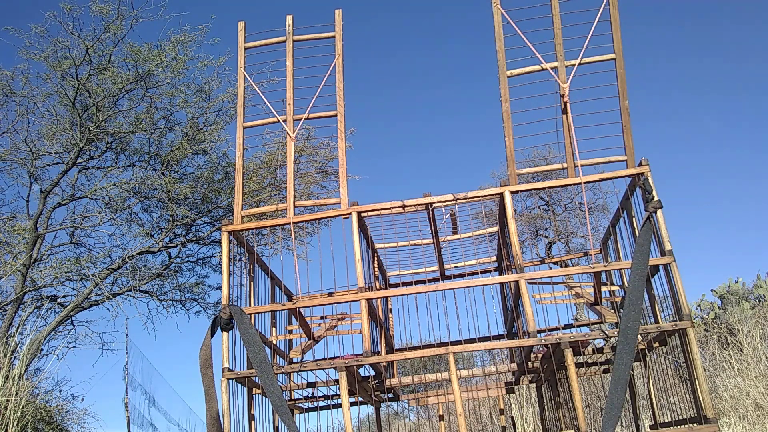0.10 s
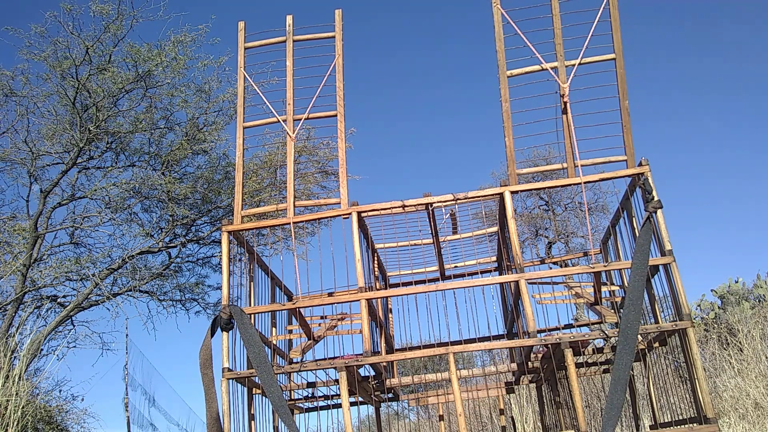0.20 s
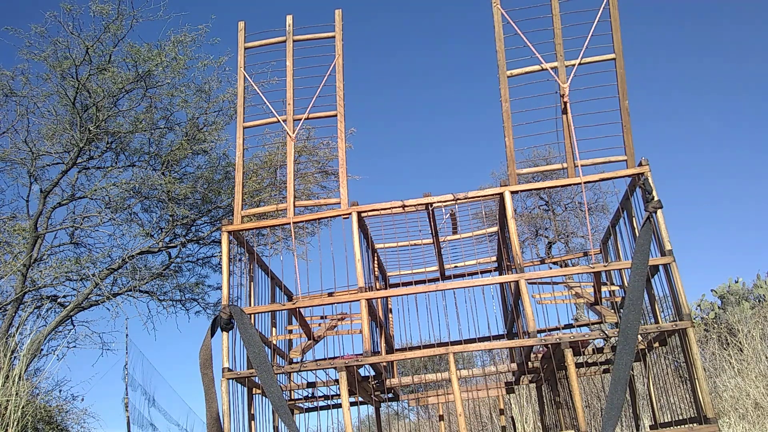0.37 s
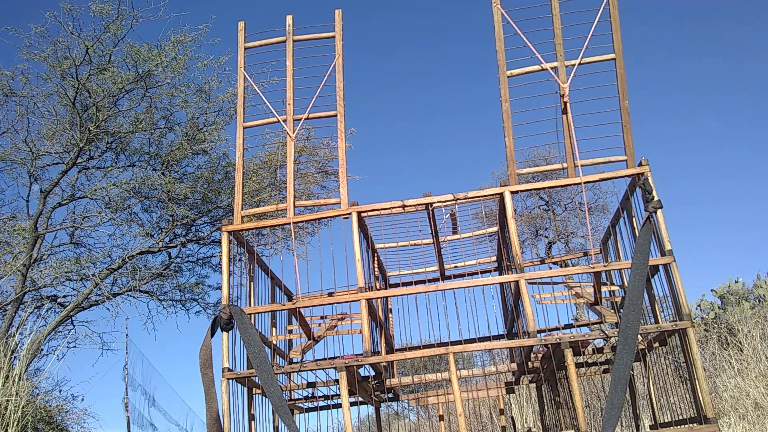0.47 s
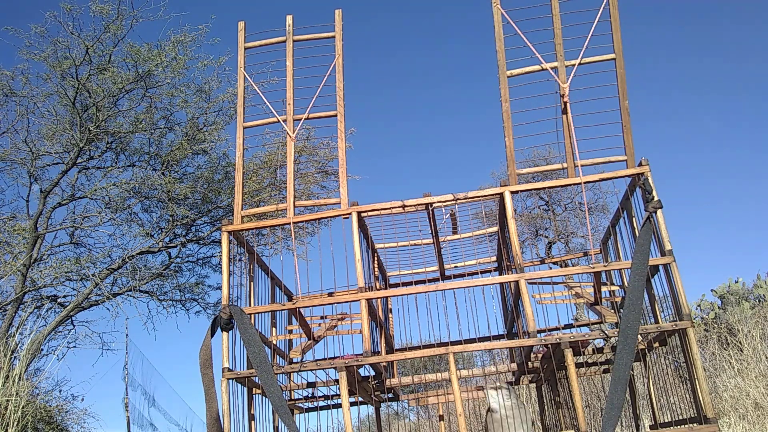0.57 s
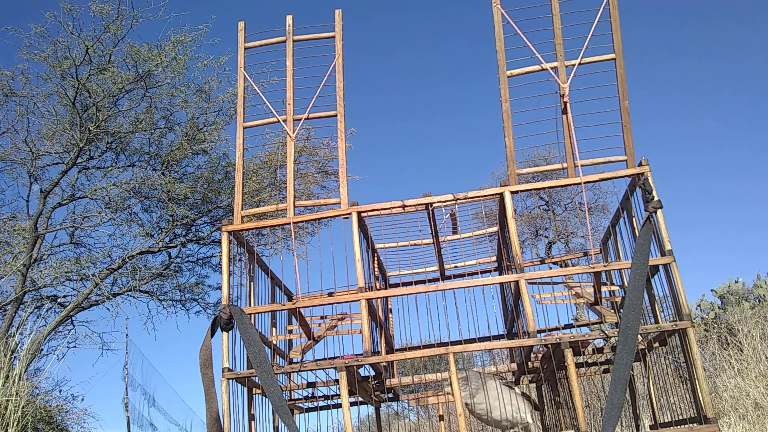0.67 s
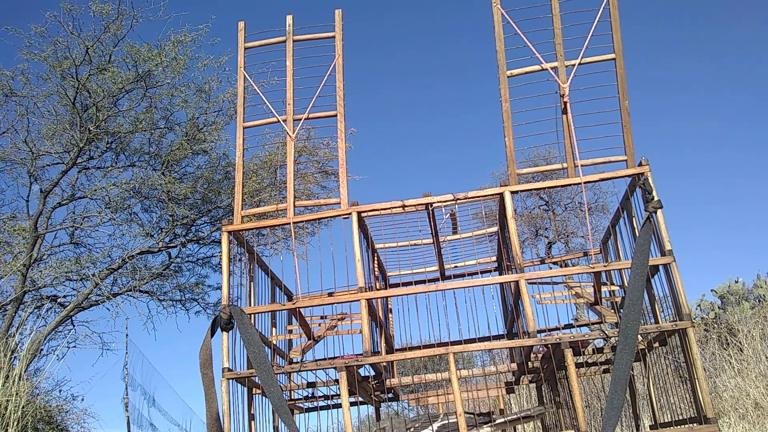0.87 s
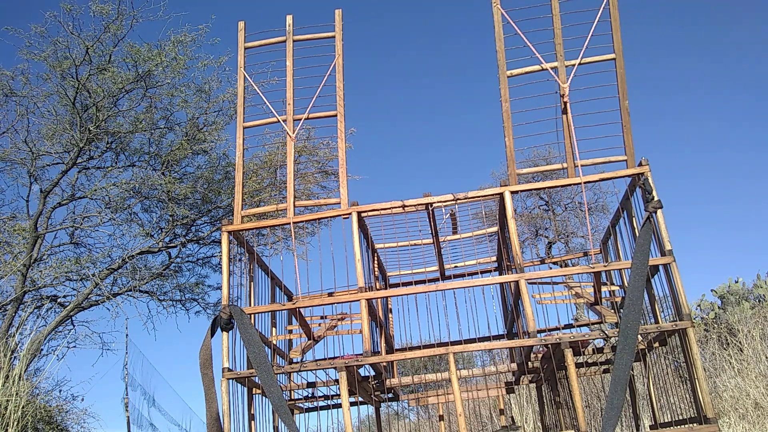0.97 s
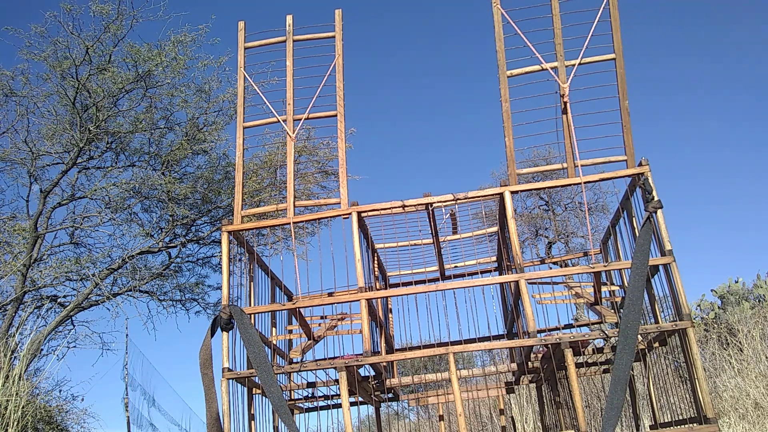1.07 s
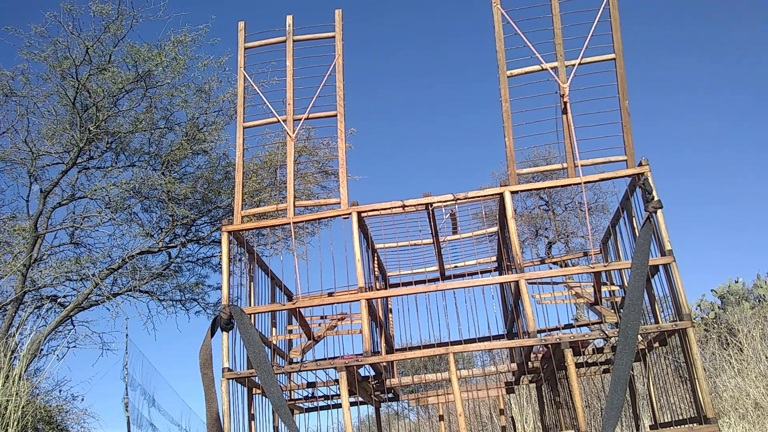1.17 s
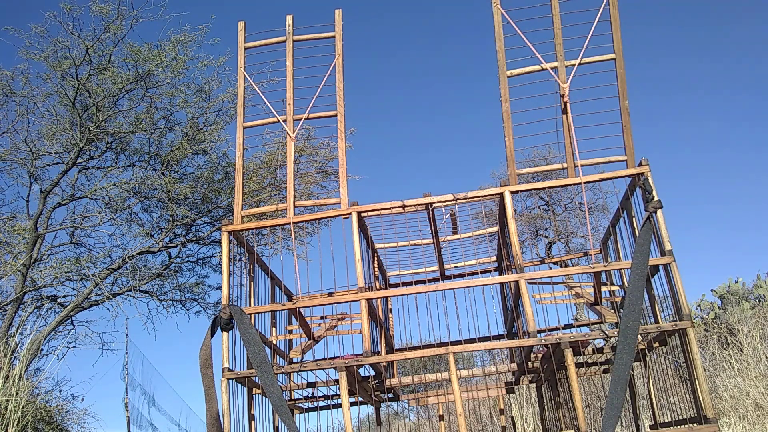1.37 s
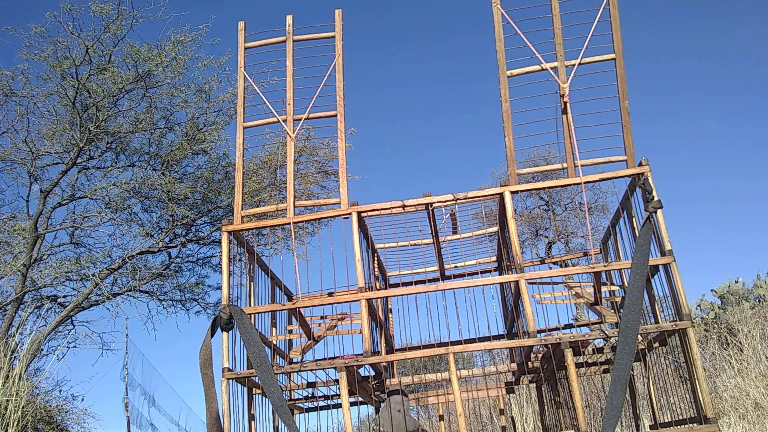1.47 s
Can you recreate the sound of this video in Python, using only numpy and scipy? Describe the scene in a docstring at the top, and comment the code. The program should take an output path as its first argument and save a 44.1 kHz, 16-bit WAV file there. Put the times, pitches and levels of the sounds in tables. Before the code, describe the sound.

Four quick bird phrases, each a short burry whistle and a bright slowing trill, over faint hush

```python
"""A mockingbird close by sings one phrase four times over a quiet background.
Each phrase is a low whistle of two beating tones, then a faint slide up into a trill of falling chirps
that slows and sinks: a swept tone shaped by a throat filter. Rasp and hiss are noise that follows the song.
Reflections near the bird hollow out a different moving pitch at each microphone as it turns its head,
and decaying echoes follow. Behind it lies a steady wide hush of filtered noise."""
import sys
import numpy as np
from scipy import signal
from scipy.fft import rfft, irfft
from scipy.io import wavfile
from scipy.ndimage import uniform_filter1d

SR = 44100
rng = np.random.default_rng(int(sys.argv[2]) if len(sys.argv) > 2 else 0)


def output_pcm(signal):
    """Save a mono or channel-first signal as 16-bit PCM at the path in sys.argv[1].

    Samples are clipped to [-1, 1] before scaling.
    """
    pcm = np.clip(np.atleast_2d(signal).T, -1, 1) * 32767
    wavfile.write(sys.argv[1], SR, np.round(pcm).astype(np.int16))


N = 68355
JITTER = 0.006  # rms pitch unsteadiness of the main voice, as a share of its pitch


def bird():
    """Superposition: whistles, trills and rasp arrive directly and by echo; a wide hiss follows their level."""
    # whistles: (start [s], length [s], first pitch [Hz], last pitch [Hz], pitch arch [Hz], level [dB],
    # upper voice [dB], upper voice fade [dB/s], roughness [0-1], opening scrape [dB],
    # closing scrape [dB], overtones [dB])
    whistle_rows = [(0.176, 0.07, 1775, 1887, -16.5, -14.5, -2.5, -550, 0.05, -34, -41, -26),
                    (0.442, 0.065, 1784, 1718, 50.5, -12.5, -4, -220, 0.07, -37, -33, -37.5),
                    (0.731, 0.07, 1815, 1721, 8, -14.5, -1.5, -100, 0.08, -39, -41.5, -25),
                    (1.059, 0.067, 1779, 1725, 71, -14.5, -1.5, -260, 0.14, -44.5, -36.5, -22.5)]
    # chirps of the four trills: (time of the top [s], top pitch [Hz], level [dB])
    chirp_rows = [
        [(.2505, 2995, -44), (.256, 3450, -27), (.2646, 3595, -11.5), (.2766, 3500, -8), (.2948, 3440, -7.5),
         (.3165, 3310, -8.5), (.336, 2960, -12.5), (.3575, 2910, -13), (.373, 2675, -21), (.3905, 2604, -33)],
        [(.5173, 3500, -32.5), (.5231, 3224, -21), (.5316, 3572, -14), (.5432, 3356, -9), (.5602, 3470, -12.5),
         (.5812, 3243, -13), (.6006, 2984, -13.5), (.6205, 2833, -18.5), (.638, 2625, -16.5),
         (.654, 2640, -25.5)],
        [(.8102, 3095, -30.5), (.8171, 3290, -28), (.8255, 3600, -14), (.8364, 3520, -11.5), (.8522, 3420, -11),
         (.8725, 3276, -13.5), (.892, 3193, -13.5), (.9125, 3120, -18.5), (.9345, 2864, -19.5),
         (.955, 2644, -19), (.9725, 2571, -23)],
        [(1.1375, 3110, -29), (1.1429, 3130, -25), (1.149, 3345, -19.5), (1.1584, 3436, -10),
         (1.1715, 3280, -10.5), (1.189, 3363, -8), (1.2097, 3284, -11), (1.2277, 3020, -15.5),
         (1.248, 2801, -16.5), (1.2695, 2760, -17.5), (1.289, 2653, -21.5), (1.31, 2568, -28)],
    ]
    # hollows as the bird turns: (time [s], left pitch [Hz], left width [Hz], left level [dB],
    # right pitch [Hz], right width [Hz], right level [dB])
    hollow_rows = [(.21, 1953, 108.7, -2.5, 2565, 47.7, -3), (0.469, 1976, 120, -1.5, 2860, 50, -1.5),
                   (0.649, 1950, 310, -1.5, 2496, 50, -1.5), (0.772, 1965, 121, -1, 2530, 77, -2),
                   (0.839, 2263, 122, -4.5, 2231, 61, -3), (.97, 2646, 100, 5, 2157, 89.5, 5),
                   (1.089, 2604, 244.5, -4.5, 2050, 200, -2.5), (1.29, 2734, 220, -3.5, 1990, 157, -1.5)]
    # rasp that trails each chirp: (frequency [Hz], relative density [dB per Hz])
    rasp_spectrum = [(300, -25.5), (700, -7.5), (1400, -2), (1900, 9.5), (2600, 3), (3400, 1),
                     (3900, -20.5), (4400, -33.5), (9000, -45)]
    # hiss that follows the level of the song: (frequency [Hz], relative density [dB per Hz])
    hiss_spectrum = [(2000, -16), (3600, -2), (4100, -23.5), (4600, -18.5), (5200, 2.5), (5900, -3.5),
                     (6700, -22.5), (7800, -5), (9000, -15.5), (10300, -6), (11500, -13.5), (13300, -4),
                     (14100, 7), (14600, 2)]
    # hiss in each phrase: (level against whistle [dB], level against trill [dB])
    hiss_levels = [(-42, -36), (-37.5, -33), (-39, -37), (-43.5, -43.5)]
    trill_overtone_db = [-46.5, -48.5, -41, -33.5]  # second harmonic in each phrase
    rasp_db, rasp_lag_s = [-23, -23, -27.5, -28.5], 0.0075  # level in each phrase
    flicker_db = 3.5  # rms flicker of the hiss
    echo_db, echo_t60_s = -14, 0.019
    far_db, far_t60_s = -33, .3

    t = np.arange(N) / SR
    whistles = [whistle(*row) for row in whistle_rows]
    trills = [trill(chirps, db) for chirps, db in zip(chirp_rows, trill_overtone_db)]

    rasp_drive = sum(amp(db) * x for db, x in zip(rasp_db, trills))
    rasp_level = np.interp(t - rasp_lag_s, t, effort(rasp_drive, size=260))
    rasp = rasp_level * noise(rasp_spectrum)
    song = sum(whistles) + sum(trills) + rasp

    at, *columns = np.transpose(hollow_rows)
    curves = [np.interp(t, at, column) for column in columns]
    direct = np.array([hollow(song, *curves[:3]), hollow(song, *curves[3:])])

    hiss_level = sum(effort(amp(whistle_db) * low + amp(trill_db) * high, size=750)
                     for (whistle_db, trill_db), low, high in zip(hiss_levels, whistles, trills))
    hiss = hiss_level * np.array([noise(hiss_spectrum), noise(hiss_spectrum)])
    hiss = hiss * amp(flicker_db * waver(size=120))

    near = amp(echo_db) * echoes(direct.mean(0), echo_t60_s)
    far = amp(far_db) * echoes(direct.mean(0), far_t60_s)
    return direct + hiss + near + far


def whistle(start, length, first_hz, last_hz, arch_hz, db, upper_db, fade_db_per_s, rough,
            open_db, close_db, buzz_db):
    """Beating and intermodulation: two close tones swell together, and powers of the sum add overtones."""
    # huskiness, scaled by the roughness: (frequency [Hz], relative density [dB per Hz])
    husk_spectrum = [(1000, -28.5), (1500, -8), (1800, 13.5), (2100, -3), (2600, -8), (3200, -18),
                     (3700, -7), (4100, -22.5), (4600, -43.5), (9000, -52.5)]
    # low scrape as the whistle opens and closes: (frequency [Hz], relative density [dB per Hz])
    scrape_spectrum = [(300, -24), (600, -12), (850, 0.5), (1400, -1), (1900, 6.5), (2600, -2.5),
                       (3500, -19), (6000, -52.5)]
    husk_db = 4.5
    upper_start_hz, upper_sag_hz_per_s, upper_jitter = 2123, 2500, 0.0057
    sideband_db, third_harmonic_db = -21, -42
    swell_power = 1.42
    scrape_inset_s, scrape_s = .006, 0.0042

    clock = np.arange(N) / SR - start
    t = np.clip(clock, 0, length)
    arch = abs(np.sin(np.pi * t / length))
    hz = first_hz + (last_hz - first_hz) * t / length + arch_hz * arch
    upper_hz = upper_start_hz - upper_sag_hz_per_s * t

    # sidebands lie one beat frequency outside the two tones
    sidebands = voice(2 * hz - upper_hz, upper_jitter) + voice(2 * upper_hz - hz, upper_jitter)
    upper = voice(upper_hz, upper_jitter) + amp(sideband_db) * sidebands
    upper_gain = amp(upper_db + fade_db_per_s * t)
    pair = voice(hz, JITTER) + upper_gain * upper * (1 + rough * waver(size=24))
    husk = rough * amp(husk_db) * noise(husk_spectrum)

    # powers of the analytic signal give sum frequencies alone
    tone = signal.hilbert(arch ** swell_power * (pair + husk))
    buzz = amp(buzz_db) * tone ** 2 / 2 + amp(third_harmonic_db) * tone ** 3 / 2
    edges = sum(amp(edge_db) * np.exp(-((clock - s) / scrape_s) ** 2)
                for s, edge_db in [(scrape_inset_s, open_db), (length - scrape_inset_s, close_db)])
    return amp(db) * (tone + buzz).real + edges * noise(scrape_spectrum)


def trill(chirps, overtone_db):
    """Frequency modulation with a source and filter: pitch swings between tops and troughs in a throat."""
    # throat response: (frequency [Hz], gain [dB])
    throat = [(1500, 1), (2300, -2.5), (2700, 6), (3100, 3), (3350, -4.5), (3550, -5), (3800, -12),
              (4200, -44.5)]
    # response for the second harmonic: (frequency [Hz], gain [dB])
    overtone_response = [(4200, -6), (4800, -2.5), (5400, -6.5), (6000, -4.5), (6700, -20.5), (7500, -11.5)]
    # closing of the voice, in full between slow chirps: (share of the way to the next top [0-1], gain [dB])
    closing = [(0, -1.5), (.14, -3.5), (.3, 0.5), (.47, -18.5), (.66, -17.5), (.77, -36), (.87, -4.5),
               (1, 2)]
    fall_hz_per_s, lowest_hz = 62000, 2230  # the faster the chirps, the shallower the troughs
    fall_share, full_gap_s = 0.45, 0.023  # trough position between tops; gap that closes in full
    lead_s, lead_hz, lead_db = 0.015, 2460, -44  # faint slide before the first top
    flutter_s, flutter_hz = 0.0027, 486  # last step of the slide, before and below the first top
    last_fall_hz, end_s, end_db = 117, 0.0082, -33.5
    overtone_jitter = 0.024

    t = np.arange(N) / SR
    at, top_hz, db = np.transpose(chirps)
    gaps = np.diff(np.r_[at, at[-1] + end_s])
    low_hz = np.maximum(top_hz - fall_hz_per_s * gaps, lowest_hz)
    low_hz = np.r_[low_hz[:-1], top_hz[-1] - last_fall_hz]

    # tops and troughs alternate; easing rounds the turns of pitch
    turns = np.r_[at[0] - lead_s, at[0] - flutter_s, np.c_[at, at + fall_share * gaps].ravel()]
    turn_hz = np.r_[lead_hz, top_hz[0] - flutter_hz, np.c_[top_hz, low_hz].ravel()]
    index = np.arange(len(turns))
    swing = np.interp(t, turns, index)
    eased = swing - .6 * np.sin(2 * np.pi * swing) / (2 * np.pi)
    hz = np.interp(eased, index, turn_hz)

    share = np.interp(t, at, np.arange(len(at))) % 1
    closing_depth = np.interp(t, at + gaps / 2, np.minimum(gaps / full_gap_s, 1) ** 2)
    closing_db = closing_depth * np.interp(share, *np.transpose(closing))
    ends = np.r_[turns[0], at, at[-1] + end_s]
    level_db = np.interp(t, ends, np.r_[lead_db, db, end_db]) + closing_db
    gate = np.clip(np.minimum(t - ends[0], ends[-1] - t) / .003 + 1, 0, 1)  # 3 ms ramps
    gain = uniform_filter1d(gate * amp(level_db), size=50)

    fundamental = colour(gain * voice(hz, JITTER), throat)
    overtone = colour(gain * voice(2 * hz, overtone_jitter), overtone_response)
    return fundamental + amp(overtone_db) * overtone


def voice(hz, jitter):
    """Phase is the integral of frequency: one side of the syrinx sounds a pure, slightly unsteady tone."""
    shimmer = 0.0081  # rms share of the amplitude
    phase = 2 * np.pi * np.cumsum(hz * (1 + jitter * waver())) / SR
    return np.sin(phase) * (1 + shimmer * waver())


def waver(size=30):
    """Random modulation: white noise smoothed twice over size samples, with an rms of one."""
    return unit(uniform_filter1d(uniform_filter1d(rng.standard_normal(N), size), size))


def effort(x, size):
    """Envelope detection: the root of the power averaged twice over size samples."""
    power = uniform_filter1d(uniform_filter1d(x ** 2, size=size), size=size)
    return np.sqrt(abs(power))


def hollow(x, hz, width_hz, db):
    """Destructive interference: a close reflection cancels one moving pitch at a microphone."""
    span_hz = 1074
    # shift the moving pitch to zero, low-pass, and shift back
    turn = np.exp(2j * np.pi * np.cumsum(hz) / SR)
    pole = np.exp(-np.pi * span_hz / SR)
    smooth = signal.lfilter([(1 - pole) / 2] * 2, [1, -pole], signal.hilbert(x) / turn)
    band = (turn * smooth).real
    return amp(db) * (x - (1 - width_hz / span_hz) * band)


def echoes(x, t60):
    """Exponential decay of scattered reflections, with independent arrivals at each microphone."""
    t = np.arange(SR // 2) / SR
    decay = np.exp(-np.log(1000) * t / t60)  # 60 dB down at t60
    taps = rng.standard_normal((2, len(t))) * decay * (t > .002)
    return signal.fftconvolve(x[None], taps / np.linalg.norm(taps[0]), axes=1)[:, :N]


def hush():
    """Partial coherence: the steady wide background hush is a common noise plus an opposed one."""
    # hush common to both microphones: (frequency [Hz], relative density [dB per Hz])
    mid_spectrum = [(25, -33.5), (70, -14.5), (180, -9.5), (270, -7.5), (400, -7), (520, -9), (750, -17),
                    (1200, -20), (1850, -24), (2250, -48.5), (2850, -24.5), (3500, -23), (4400, -33),
                    (5600, -28.5), (7000, -30), (12000, -35), (15000, -36)]
    # hush of opposite sign at the microphones: (frequency [Hz], relative density [dB per Hz])
    side_spectrum = [(25, -23.5), (55, -9.5), (110, -1.5), (170, -2.5), (350, -4.5), (550, -9.5),
                     (1100, -32.5), (1700, -19), (2400, -17), (3300, -29), (4200, -19), (7000, -25),
                     (12000, -31), (15000, -39.5)]
    mid = amp(-58.5) * noise(mid_spectrum)
    side = amp(-59.5) * noise(side_spectrum)
    return np.array([mid + side, mid - side])


def noise(points):
    """Spectral shaping: white noise filtered to the given spectrum, with an rms of one."""
    return unit(colour(rng.standard_normal(N), points))


def colour(x, points):
    """Linear filtering: each frequency is multiplied by its own gain."""
    return irfft(rfft(x) * amp(read(points, np.fft.rfftfreq(N, 1 / SR))), N)


def read(points, hz):
    """Constant-ratio spacing: interpolates decibels along a log-frequency axis."""
    f, db = np.transpose(points)
    return np.interp(np.log(hz + 1), np.log(f + 1), db)


def unit(x):
    """Power normalisation: scales to an rms of one."""
    return x / np.sqrt(np.mean(x ** 2) + 1e-20)


def amp(db):
    """Logarithmic level: 20 dB is a factor of ten in amplitude."""
    return 10 ** (np.asarray(db) / 20)


def scene():
    """Superposition: the bird over the hush."""
    return bird() + hush()


def record(dry):
    """Band limiting: the recorder passes what lies below its upper edge, by a linear-phase filter."""
    edge_hz = 14500
    lowpass = signal.firwin(301, edge_hz, window=("kaiser", 9), fs=SR)
    return signal.oaconvolve(dry, lowpass[None], "same")


dry = scene()
out = record(dry)
output_pcm(out)
```